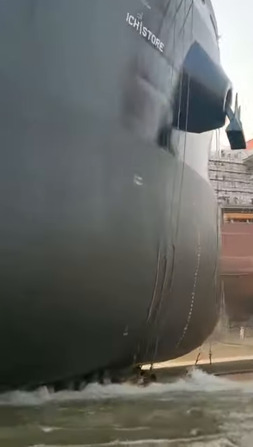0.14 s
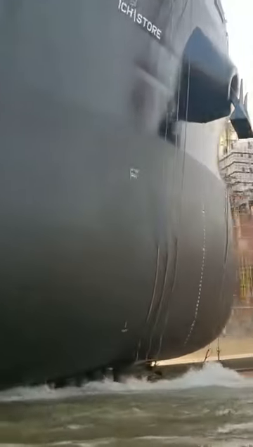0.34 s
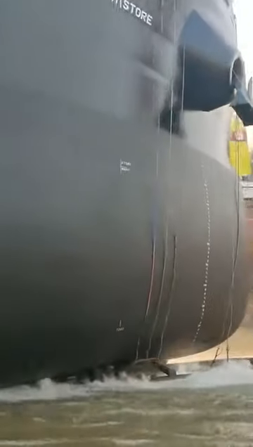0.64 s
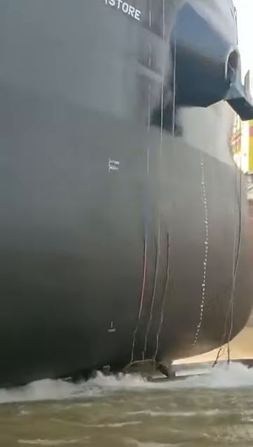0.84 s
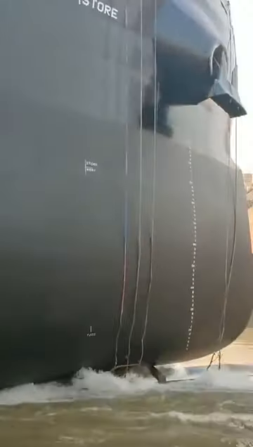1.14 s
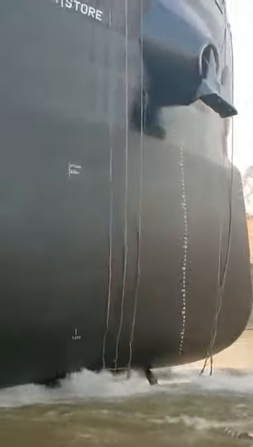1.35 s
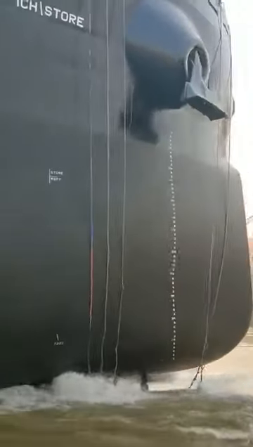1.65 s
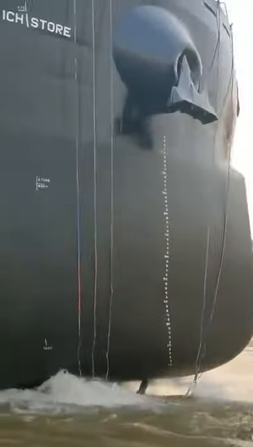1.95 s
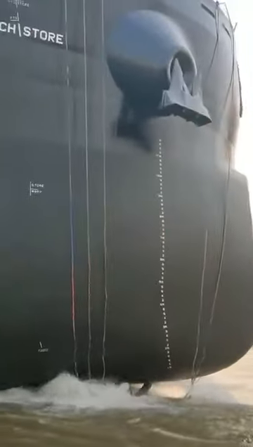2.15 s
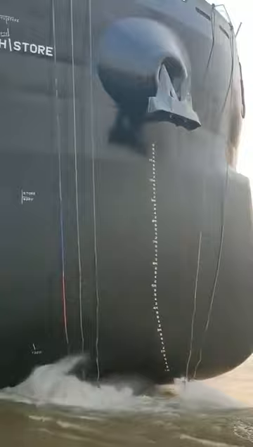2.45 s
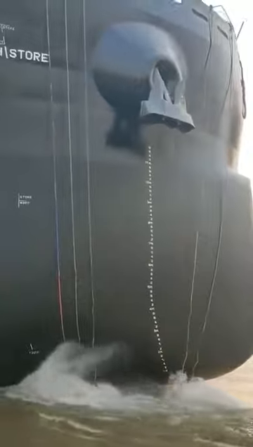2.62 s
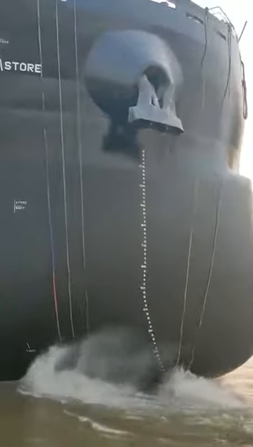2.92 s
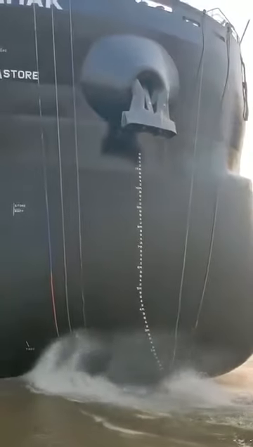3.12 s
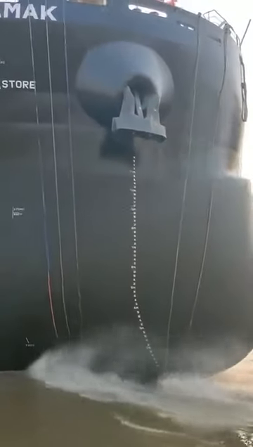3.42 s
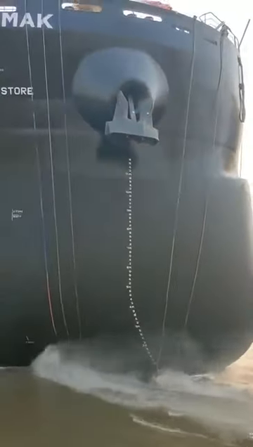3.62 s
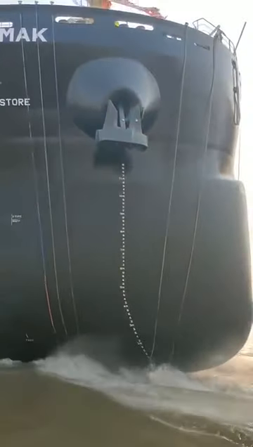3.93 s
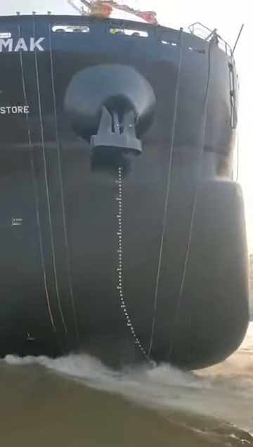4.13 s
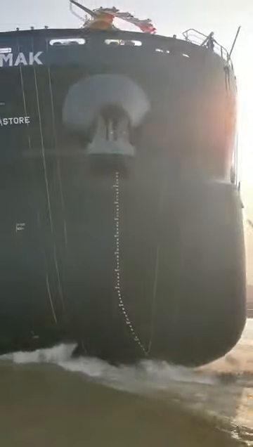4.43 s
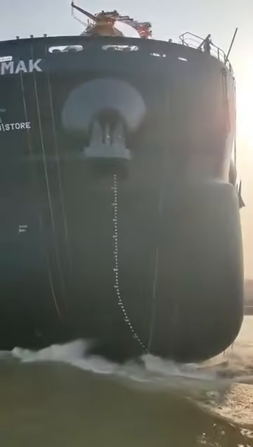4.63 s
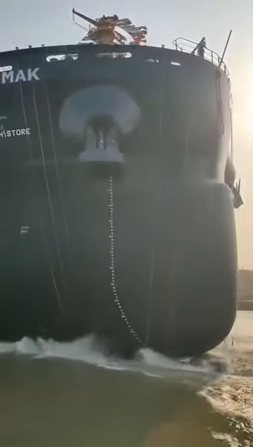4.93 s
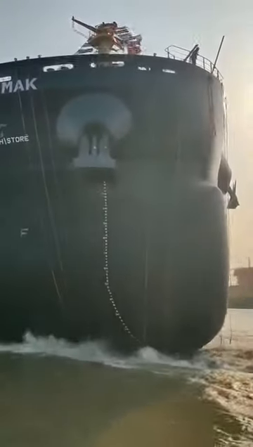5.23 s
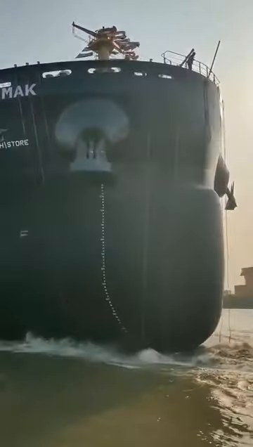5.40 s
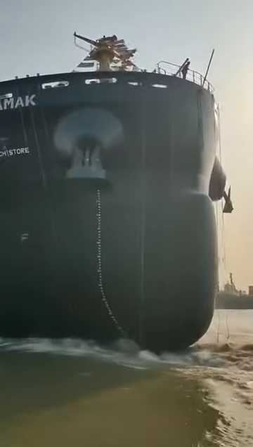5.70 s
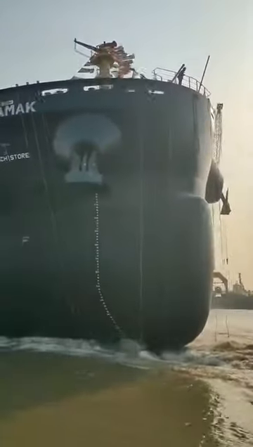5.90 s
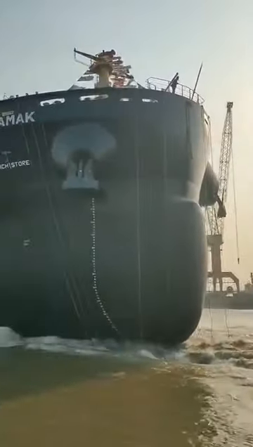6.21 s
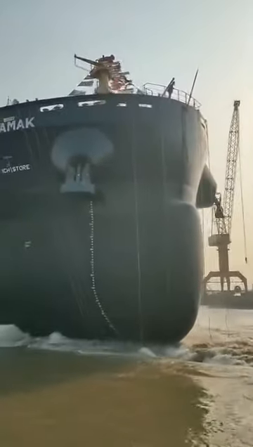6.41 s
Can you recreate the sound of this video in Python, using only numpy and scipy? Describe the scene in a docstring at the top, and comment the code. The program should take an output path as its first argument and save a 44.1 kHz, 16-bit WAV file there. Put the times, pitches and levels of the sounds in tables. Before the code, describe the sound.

Close by a large ship sliding into a river, water churns in a low, uneven rush with faint fizzing spray. Wind booms and thumps on the unprotected stereo microphone, first mostly left, then right. Dry firecracker cracks burst in tight bunches, densest about a quarter of the way in, with hollow knocks and a rolling echo. Near the end the wind rasps and flutters on the right.

```python
"""A large ship slides down a slipway into a river, heard from close by on a windy day.
Water churns and sprays at the bow, as patchy noise; sharp cracks, probably launch firecrackers, are
pressure pulses that go off in bunches, with echoes that roll round the yard.
Wind rumbles and thumps on each of two microphone ports, as uneven low noise and single pulses;
blowing straight across a port it rasps, as fluttering noise, and on the right it also hoots."""
import sys
import numpy as np
from scipy import signal
from scipy.fft import rfft, irfft
from scipy.io import wavfile
from scipy.ndimage import uniform_filter1d, minimum_filter1d

SR = 44100
rng = np.random.default_rng(int(sys.argv[2]) if len(sys.argv) > 2 else 0)


def bounce(signal):
    """Save signal as a 16-bit WAV file at the path given by the first command-line argument."""
    frames = np.transpose(np.atleast_2d(signal))
    limited = np.clip(frames, -1, 1)
    pcm = np.round(limited * 32767).astype(np.int16)
    wavfile.write(sys.argv[1], SR, pcm)


N = 289362
HOP = 128  # samples between spectral frames
TIME = np.arange(N) / SR
FRAME_S = np.arange(N // HOP + 5) * HOP / SR
BIN_HZ = np.fft.rfftfreq(4 * HOP, 1 / SR)


def amp(db):
    """Level: decibels become an amplitude ratio."""
    return 10 ** (np.asarray(db) / 20)


def unit(x):
    """Normalisation: scales to rms 1."""
    return x / np.sqrt(np.mean(x ** 2) + 1e-20)


def curve(rows, t=TIME):
    """Linear interpolation in time of a table of (s, value)."""
    return np.interp(t, *np.transpose(rows))


def spectrum(rows, hz):
    """Interpolation of a table of (Hz, value) on a logarithmic frequency axis."""
    f, value = np.transpose(rows)
    return np.interp(np.log(hz + 1), np.log(f + 1), value)


def coloured(x, rows):
    """Spectral shaping by a table of (Hz, dB)."""
    gain = amp(spectrum(rows, np.fft.rfftfreq(N, 1 / SR)))
    return irfft(rfft(x) * gain, N)


def wander(rate_hz):
    """Low-passed random motion of rms 1, up to about the given rate."""
    hz = np.fft.rfftfreq(N, 1 / SR)
    return unit(irfft(rfft(rng.standard_normal(N)) / (1 + (hz / rate_hz) ** 4), N))


def flutter(rate_hz):
    """Band-passed random pulsing of rms 1 around the given rate."""
    ratio = np.fft.rfftfreq(N, 1 / SR) / rate_hz
    return unit(irfft(rfft(rng.standard_normal(N)) * ratio ** 2 / (1 + ratio ** 4), N))


def band(x, low_hz, high_hz):
    """First-order causal high-pass and low-pass."""
    x = signal.sosfilt(signal.butter(1, low_hz, "high", fs=SR, output="sos"), x)
    return signal.sosfilt(signal.butter(1, min(high_hz, .45 * SR), fs=SR, output="sos"), x)


def dulled(x, edge_hz):
    """Fourth-order causal low-pass."""
    return signal.sosfilt(signal.butter(4, min(edge_hz, .45 * SR), fs=SR, output="sos"), x)


def add(mix, s, sound):
    """Superposition: mixes a sound in at time s."""
    part = mix[max(round(s * SR), 0):][:len(sound)]
    part += sound[:len(part)]


# Left-right likeness of distant sound. Each row: frequency in Hz, correlation from 0 to 1.
PORT_LIKENESS = [(100, 0.58), (550, 1), (1000, 0.63), (1700, 0.17), (3000, 0.049), (8000, 0.07)]


def noise(gain):
    """Partial coherence: stereo noise under a frames x bins gain; the two ports hear the bass alike."""
    a, b, c, d = rng.standard_normal((len(FRAME_S), len(BIN_HZ), 4)).transpose(2, 0, 1)
    same = np.clip(spectrum(PORT_LIKENESS, BIN_HZ), -1, 1)
    left, other = a + 1j * b, c + 1j * d
    right = same * left + np.sqrt(1 - same ** 2) * other
    z = np.array([left, right]) * gain
    return unit(signal.istft(z.transpose(0, 2, 1), nperseg=4 * HOP, noverlap=3 * HOP)[1][:, :N])


def water(rows, patchy_db, flicker_db):
    """Turbulent foam noise: patches of pitch and time collapse; slaps, if any, lift all bands at once."""
    field = rng.standard_normal((len(FRAME_S), len(BIN_HZ)))
    patches = unit(uniform_filter1d(uniform_filter1d(field, size=14, axis=0), size=5, axis=1))
    slaps = np.interp(FRAME_S, TIME, wander(40))[:, None]
    return noise(amp(spectrum(rows, BIN_HZ) + patchy_db * patches + flicker_db * slaps))


# Course of the churning water. Each row: time in seconds, level in dB.
CHURN_LEVEL = [(0, -24.5), (.6, -31.5), (1.2, -30), (1.9, -27), (2.4, -27), (2.9, -28), (3.4, -29),
               (3.9, -30), (4.5, -27), (5.4, -29), (6.56, -28)]
# Colour of the churning water. Each row: frequency in Hz, relative density in dB per Hz.
CHURN_COLOUR = [(30, 1.5), (120, -12), (230, -1), (420, -5.5), (620, -11), (1000, -14.5), (2000, -18.5),
                (4000, -29), (8000, -38), (16000, -54)]


def river():
    """Broadband turbulence: churning water is low-weighted noise of uneven pitch."""
    return amp(curve(CHURN_LEVEL)) * water(CHURN_COLOUR, patchy_db=2.5, flicker_db=0.0)


# Course of the spray thrown up by the bow. Each row: time in seconds, level in dB.
SPRAY_LEVEL = [(0, -43.5), (1.2, -42.5), (2.2, -43.5), (3, -40), (3.8, -43.5), (4.4, -44.5), (5.3, -45),
               (6.56, -47)]
# Colour of the spray. Each row: frequency in Hz, relative density in dB per Hz.
SPRAY_COLOUR = [(1000, -17), (3500, -4), (6500, 7), (10000, 10.5), (16000, 3.5)]


def spray():
    """Broadband fizz: spray is treble noise, all of it lifted at once by slaps."""
    return amp(curve(SPRAY_LEVEL)) * water(SPRAY_COLOUR, patchy_db=1.5, flicker_db=1.4)


def wind_level(steady, buffets):
    """Addition of powers: each buffet swells and dies as a bell on the steady push; level in dB."""
    power = amp(curve(steady)) ** 2
    for s, length, db in buffets:
        power = power + amp(db) ** 2 * np.exp(-np.minimum((2 * (TIME - s) / length) ** 2, 20))
    return 10 * np.log10(power)


# Colour of wind pressing on a port. Each row: frequency in Hz, relative density in dB per Hz.
RUMBLE_COLOUR = [(5, -21), (18, 1.5), (35, 0.5), (65, -7), (110, -10), (200, -14), (350, -24.5), (700, -31),
                 (2000, -67.5)]


def rumble(steady, buffets, lumpy_db):
    """Turbulent pressure: eddies press on one port in uneven lumps."""
    eddies = coloured(rng.standard_normal(N), RUMBLE_COLOUR) * amp(lumpy_db * wander(30.5))
    slow = np.sqrt(uniform_filter1d(eddies ** 2, size=6000) + 1e-20)  # running rms
    return amp(wind_level(steady, buffets)) * eddies / slow


# Steady push of the wind on each port. Each row: time in seconds, level in dB.
PUSH_LEFT = [(0, -15.5), (.85, -20), (1.1, -25), (1.9, -31.5), (2.25, -22.5), (2.85, -20.5), (3.1, -23),
             (4.4, -25.5), (5.3, -30.5), (6.15, -27), (6.56, -36)]
PUSH_RIGHT = [(0, -26), (.3, -22), (.6, -17), (1.15, -16), (1.5, -17.5), (2.2, -21), (2.8, -14),
              (3.2, -17.5), (3.4, -25), (3.6, -16), (3.85, -24), (4.6, -17), (5.3, -21), (5.75, -25.5),
              (6, -19), (6.56, -22.5)]
# Single buffets on each port. Each row: middle in seconds, length in seconds, level in dB.
BUFFET_LEFT = [(0.103, 0.041, -9), (0.243, 0.044, -13.5), (0.473, 0.05, -8.5), (0.747, 0.097, -14),
               (0.876, 0.045, -18), (1.008, 0.038, -7.5), (2.89, 0.047, -14), (3.571, 0.046, -12.5),
               (3.978, 0.054, -14)]
BUFFET_RIGHT = [(.105, 0.077, -6), (1.225, 0.05, -10), (2.38, 0.035, -18), (3.98, 0.077, -12),
                (4.531, 0.041, -26), (4.7, 0.062, -9), (5.14, 0.023, -19), (5.9, 0.085, -13.5),
                (6.14, 0.12, -15)]


def wind_rumble():
    """Local turbulence: the wind presses on each port on its own."""
    left = rumble(PUSH_LEFT, BUFFET_LEFT, lumpy_db=2.0)
    right = rumble(PUSH_RIGHT, BUFFET_RIGHT, lumpy_db=4.0)
    return np.array([left, right])


RASP_ATTACK_S, RASP_RELEASE_S = 0.0096, 0.0049  # time for 10 dB of rise and of fall
# The dull rasp left between gusts, its level and edge relative like those of the gusts.
BREEZE_RELATIVE_DB, BREEZE_EDGE_HZ = -38, 464


def gusting(gusts):
    """Power-weighted level in dB and edge in Hz, per frame: gusts catch the lip, swell or sag, let go."""
    start, length, db, swell_db, edge_hz = np.transpose(gusts)[:, :, None]
    t = FRAME_S - start
    rise = np.maximum(-t, 0) / RASP_ATTACK_S
    fall = np.maximum(t - length, 0) / RASP_RELEASE_S
    swell = swell_db * (np.clip(t / length, 0, 1) - .5)
    power = amp(db + swell - 10 * (rise + fall)) ** 2
    breeze = amp(BREEZE_RELATIVE_DB) ** 2
    total = power.sum(0) + breeze
    return 10 * np.log10(total), ((power * edge_hz).sum(0) + breeze * BREEZE_EDGE_HZ) / total


def pressure_spits(edge_hz, spits_per_s):
    """Impulsive pressure: random eddies spit either way, and a faster eddy passes sooner."""
    size = amp(6.3 * np.minimum(rng.exponential(1, N), 2.5))  # mostly small, a few large
    eddies = size * (rng.random(N) < spits_per_s / SR)
    breadth, sign = rng.uniform(0.61, 1.65, N), rng.choice([-1, 1], N)
    spits = np.zeros(N)
    for i in np.flatnonzero(eddies):
        width = round(breadth[i] * SR / np.interp(TIME[i], FRAME_S, edge_hz))
        add(spits, TIME[i], sign[i] * eddies[i] * np.hanning(width))
    return unit(dulled(band(spits, 255, 8000), 3030))


# Colour of the torn air before its upper edge. Each row: frequency in Hz, relative density in dB per Hz.
RASP_COLOUR = [(30, -3), (150, -11.5), (350, 1.5), (600, -6), (1000, -9), (1500, -7.5), (2200, -8),
               (4000, -12.5), (8000, -18)]


def rasp(gusts, flutter_db, steepness, spit, spits_per_s, brightening=0.26, waver_db=0.8):
    """Edge turbulence: air tears over a lip in a fluttering, spitting hiss that brightens with each gust."""
    level_db, edge_hz = gusting(gusts)
    gust_db = np.clip(level_db + 12.0, -14, 6)
    edge_hz = edge_hz * amp(brightening * gust_db + waver_db * np.interp(FRAME_S, TIME, wander(32)))
    gain = amp(spectrum(RASP_COLOUR, BIN_HZ)) / np.sqrt(1 + (BIN_HZ / edge_hz[:, None]) ** steepness)
    field = rng.standard_normal(gain.shape)
    swirls = unit(uniform_filter1d(uniform_filter1d(field, size=7, axis=0), size=4, axis=1))
    gain = gain * amp(2.5 * swirls)  # passing vortices favour one pitch for a moment
    hiss = noise(gain / np.linalg.norm(gain, axis=1, keepdims=True))[0]
    fluttering = hiss * unit(amp(flutter_db * flutter(162)))
    torn_air = unit(fluttering + spit * pressure_spits(edge_hz, spits_per_s))
    return amp(np.interp(TIME, FRAME_S, level_db)) * torn_air


# Gusts that break over the lip of each port. Each row: start in seconds, length in seconds,
# relative level in dB, swell from start to end in dB, upper edge in Hz before it brightens and wavers.
GUSTS_LEFT = [(0, 0.2, -32, -2, 600), (.22, 0.19, -28.5, -2, 575), (.467, 0.016, -17.5, 4.5, 523),
              (.53, 0.059, -28.5, 10, 474), (.71, .056, -21, 5, 520), (.8, 0.13, -24, -7.5, 400),
              (2.857, 0.014, -19.5, 0, 504)]
GUSTS_RIGHT = [(.05, 0.023, -30, 1, 1040), (.148, 0.029, -28.5, 4, 900), (1.2, 0.012, -19.5, 7, 1290),
               (1.312, 0.019, -18.5, 2, 1390), (1.572, 0.016, -13.5, 9.5, 1720),
               (1.614, 0.037, -20, -4, 1700), (1.667, 0.027, -18.5, -11, 1870),
               (1.698, 0.033, -17, 6.5, 1750), (4.666, 0.036, -14.5, 5, 2690), (4.71, 0.015, -38, 13, 1700),
               (4.748, 0.096, -22.5, -2.5, 3320), (4.835, 0.093, -25, -0.5, 2630),
               (4.94, 0.051, -30.5, 14, 2480), (5.015, .022, -16, 1, 2320), (5.043, 0.026, -21.5, 0, 1300),
               (5.127, 0.071, -19, -4, 1820), (5.175, 0.01, -19, 12, 2370), (5.203, 0.022, -17.5, -1, 2720),
               (5.224, 0.058, -15.5, 0.5, 2200), (5.656, 0.029, -18.5, 2, 2200),
               (5.703, 0.027, -16, -1, 2600), (5.742, 0.0067, -13.5, 7, 2090),
               (5.853, 0.047, -21.5, -6, 2480), (5.886, 0.024, -10, -1, 2300),
               (5.927, 0.032, -14, -4.5, 2100), (5.976, 0.038, -15, -4.5, 2550),
               (6.015, 0.057, -20, -1, 2600), (6.063, 0.044, -20.5, 1.5, 2550),
               (6.12, 0.026, -25.5, 3, 2450), (6.16, 0.053, -17, -5, 2250),
               (6.233, 0.0059, -23.5, -10, 2630), (6.256, 0.034, -16.5, 1, 2300),
               (6.29, 0.04, -22.5, 3, 2370), (6.33, 0.011, -22.5, -1, 3320), (6.372, .022, -24.5, -2, 2310),
               (6.399, 0.025, -16, 5.5, 2350), (6.432, 0.028, -18.5, 1.5, 2100),
               (6.479, 0.026, -20.5, -1.5, 2570), (6.544, 0.013, -20.5, 8, 1940)]


def wind_rasp():
    """Local edge turbulence: each lip tears the air on its own, the right with more frequent spits."""
    left = rasp(GUSTS_LEFT, flutter_db=6.0, steepness=4.4, spit=1.0, spits_per_s=70)
    right = rasp(GUSTS_RIGHT, flutter_db=1.5, steepness=5.34, spit=0.96, spits_per_s=240)
    return np.array([amp(6.5) * left, amp(5.0) * right])


# Single eddies that thump a port. Each row: time in seconds, port (0 left, 1 right),
# relative peak in dB, length in ms.
PORT_THUMPS = [(0.023, 0, -12, 16), (0.099, 1, -7, 16), (.133, 0, -10, 12), (.341, 0, 0, 0.68),
               (0.4413, 0, 2, 7), (0.448, 0, -3, 0.87), (0.451, 1, -2, 2.7), (.458, 1, 7, 2.5),
               (.479, 1, 8, 1.7), (0.482, 0, 1, 1.6), (0.575, 0, -10, 2.6), (.715, 0, -9, 0.86),
               (0.737, 0, -4, 3), (0.7522, 0, 1, 4.3), (.757, 0, -5, 0.81), (.812, 0, -1, 3.2),
               (0.873, 0, 1.5, 6.4), (0.902, 0, -9, 3.4), (1.2108, 1, 2, 0.47), (1.263, 1, -2, 0.84),
               (1.319, 1, 1, 0.31), (1.3305, 1, -1, 0.73), (1.637, 1, -8, 0.41), (1.731, 1, -1, 0.49),
               (2.866, 0, -11, 3.2), (4.668, 1, -0.5, .5), (5.28, 1, 1.5, 0.45), (5.7497, 1, -14, 0.67),
               (5.975, 1, -10, 0.31), (6.282, 1, -9, 0.29), (6.445, 1, -2, 0.83)]


def thumps(rebound=0.16, rough=0.12):
    """Vortex passage: an eddy sucks at the port and pushes back, ragged with smaller eddies."""
    out = np.zeros((2, N))
    for s, port, db, length_ms in PORT_THUMPS:
        u = np.arange(-SR // 25, SR // 25) * 1000 / SR / length_ms
        pulse = rebound * np.exp(-(u - 1) ** 2 * 2) - np.exp(-(2 * u) ** 2)
        ragged = 1 + rough * unit(dulled(rng.standard_normal(len(u)), 600))
        before_start = max(round((1 / 25 - s) * SR), 0)
        add(out[round(port)], s - 1 / 25, (amp(db) * pulse * ragged)[before_start:])
    return out


SNAP_HZ, SNAP_WIDTH_HZ = 4460, 3200  # the bright band in which a casing bursts


def blast(push_ms, snap_db, suck=0.19, front=2100, snap_ms=0.95, shock=0.088):
    """Blast wave: a shock, a push and a suck; the longer the push, the more rounded its front."""
    ms = np.arange(3000) * 1000 / SR
    u = ms / push_ms
    wave = (1 - u) * np.exp(-u) - suck * np.exp(-(u - 2) ** 2 * 2)
    edges = [SNAP_HZ - SNAP_WIDTH_HZ / 2, SNAP_HZ + SNAP_WIDTH_HZ / 2]
    casing = signal.butter(2, edges, "band", fs=SR, output="sos")
    tearing = unit(signal.sosfilt(casing, rng.standard_normal(len(ms))))
    wave = wave + amp(snap_db) * np.exp(-ms / snap_ms) * tearing
    wave = signal.sosfilt(signal.butter(2, min(front / push_ms, 9000), fs=SR, output="sos"), wave)
    return wave + shock * band(signal.unit_impulse(len(ms)), 9200, 19000)


def small_pops(per_crack=.4, spread_s=0.045, pop_db=-23):
    """Random clustering: weaker, farther crackers of the same bunch go off around the loud ones."""
    pops = []
    draws = rng.random((len(CRACKERS), 3))
    for (s, db, _, _, knock_hz, snap_db), (chance, delay, size) in zip(CRACKERS, draws):
        if db > -9 and chance < per_crack:
            pops.append((s + spread_s * (2 * delay - .3), pop_db + 7 * size, .4, -4, knock_hz, snap_db))
    return pops


KNOCK_MS, KNOCK_DB = 4.7, -16  # decay of the hollow ring after each crack, and its level against the crack
SCATTER_EDGE_HZ = 4900  # the quay throws back little treble
# Firecrackers. Each row: time in seconds, relative level in dB, length of the pressure push in ms,
# relative scattered sound in dB, pitch of the hollow ring in Hz, relative bright snap of the casing in dB.
CRACKERS = [(0.061, -8.5, 1, -3, 480, -24), (.498, -18.5, 0.23, 12.5, 1460, -25),
            (.919, -20.5, 0.26, 4, 690, -19), (0.957, -18.5, 0.35, 8.5, 600, -21),
            (1.3486, 3, 0.63, 0.5, 420, -16), (1.3974, -8.5, .6, 9, 320, -17),
            (1.4596, 7, 0.47, -10, 560, -20), (1.4967, 1.5, 0.41, -7, 560, -15),
            (1.510, -3.5, 0.98, -11, 500, -21), (1.5361, 5, 0.4, -1.5, 430, -24),
            (1.5464, -7, .55, 2.5, 450, -16), (1.5817, 0.5, 0.43, 5, 453, -19),
            (1.5905, -10, 1, -21, 497, -13), (1.6282, 5.5, 0.69, -22, 674, -25),
            (1.677, -3, 0.54, 3, 445, -21), (1.7508, 4, 0.74, -9, 725, -23),
            (1.7991, -0.5, 0.58, 3, 440, -11), (1.8047, -10, .4, -3, 510, -14),
            (2.422, 2, 0.7, -12, 650, -19), (2.484, -7.5, 0.63, 2, 487, -17),
            (3.2673, 0, 0.64, -2, 726, -10), (3.3139, -8, .5, -6, 500, -14),
            (3.3168, 3, 0.46, -12, 633, -9.5), (3.3472, -0.5, 0.94, -5, 446, -26),
            (3.7387, -10, 0.29, -1, 1020, -13.5), (4.029, 4.5, 0.47, -11, 427, -11),
            (4.0536, 3.5, 0.51, -4.5, 443, -13), (4.080, -16, 0.57, -12, 500, -18),
            (4.103, -5.5, 0.38, 0, 740, -17), (4.1252, -4.5, 0.57, 11, 400, -17),
            (4.1504, -2, 0.71, 2.5, 335, -21), (4.2242, -7.5, .75, 5, 420, -17),
            (4.767, 0, 0.46, -6, 358, -11), (4.8141, 0, 0.53, -4, 470, -22),
            (4.8164, 2, 0.47, -9, 478, -14.5), (4.879, -5.5, 0.75, -20, 456, -19),
            (5.5869, 7, 0.47, -14, 455, -28), (5.6345, 1.5, 0.46, -3.5, 510, -24)]
# Near reflections of each crack. Each row: delay in ms before random stretching, relative level in dB.
NEAR_ECHOES = [(1.75, -10), (3.6, -10.5), (4.4, -12), (7.2, -25.5), (10.5, -31), (15, -37)]


def firecrackers(right_lead_ms=0.095, scatter_ms=8, apart=0.82, echo_edge_hz=5500):
    """Reflection and scattering: a blast, its hollow ring, echoes, and quay scatter unlike in the ports."""
    out, ms = np.zeros((2, N)), np.arange(3000) * 1000 / SR
    for s, db, push_ms, scatter_db, knock_hz, snap_db in list(CRACKERS) + small_pops():
        wave = amp(db) * blast(push_ms, snap_db)
        # each bursts at its own spot, so its echoes are shifted
        shift = np.clip(1 + .08 * rng.standard_normal(len(NEAR_ECHOES)), .5, 2)
        knock = amp(db + KNOCK_DB) * np.exp(-ms / KNOCK_MS) * np.sin(2 * np.pi * knock_hz * ms / 1000)
        echo, dull = band(wave, 25, echo_edge_hz), band(wave, 19, SCATTER_EDGE_HZ)
        shared = rng.standard_normal(len(ms))
        for port, start in zip(out, (s, s - right_lead_ms / 1000)):
            add(port, start, wave + knock)
            for (delay_ms, echo_db), stretch in zip(NEAR_ECHOES, shift):
                add(port, start + delay_ms * stretch / 1000, amp(echo_db) * echo)
            scatter = shared + apart * rng.standard_normal(len(ms))
            scatter = scatter * np.exp(-ms / scatter_ms) * (1 - np.exp(-ms))
            scatter = scatter / np.linalg.norm(scatter)
            add(port, start, amp(scatter_db - 1.0) * signal.fftconvolve(dull, scatter))
    return amp(2.5) * band(out, 162, 8800)


# Ring of the yard and hull. Each row: frequency in Hz, time to decay by 60 dB in seconds.
YARD_DECAY = [(200, 6.1), (600, 2.48), (2000, 1.75), (8000, 0.87)]


def yard(x):
    """Reverberation: a long diffuse tail, dying faster in the treble."""
    tail = noise(amp(-60 * FRAME_S[:, None] / spectrum(YARD_DECAY, BIN_HZ)))[:, :2 * SR]
    tail = tail * (1 - np.exp(-TIME[:2 * SR] / 0.006))  # builds up over milliseconds
    return signal.fftconvolve(x, tail / np.linalg.norm(tail[0]), axes=1)[:, :N]


# Thin bright ticks of the left port when it is hit hard. Each row: time in seconds, relative level in dB.
PORT_TICKS = [(0.4403, -1.5), (2.421, -3), (4.0293, -5), (4.054, -5), (4.7668, -6)]


def ticks(ring_ms=0.39):
    """Impulsive excitation: a very short, decaying burst of treble noise."""
    out, ms = np.zeros(N), np.arange(200) * 1000 / SR
    for s, db in PORT_TICKS:
        add(out, s, amp(db) * np.exp(-ms / ring_ms) * rng.standard_normal(len(ms)))
    return band(band(out, 6500, 16000), 6500, 16000)


# Vortices that lock on to the right port and hoot hoarsely. Each row: start in seconds, length in seconds,
# relative level in dB, start pitch in Hz, end pitch in Hz, both before jitter.
PORT_HOOTS = [(4.694, 0.019, -10, 863, 705), (5.04, .045, -20.5, 521, 453), (5.271, 0.013, -8.5, 1012, 720),
              (5.745, 0.023, -11, 750, 394), (5.788, 0.03, -15, 416, 472), (5.944, 0.011, -7.5, 700, 800),
              (6.408, 0.043, -14.5, 509, 447)]


def hoots(pitch_jitter=0.13, rough_db=6.5):
    """Vortex shedding: a sliding, unsteady pitch sounds briefly."""
    out, sway, size = np.zeros(N), wander(300), unit(amp(rough_db * flutter(200)))
    for s, length, db, start_hz, end_hz in PORT_HOOTS:
        u = np.clip((TIME - s) / length, 0, 1)
        on = (u > 0) & (u < 1)
        hz = (start_hz + (end_hz - start_hz) * u[on]) * (1 + pitch_jitter * sway[on])
        swell = np.sqrt(2 * np.sin(np.pi * u[on]))
        out[on] += amp(db) * swell * size[on] * np.sin(2 * np.pi * np.cumsum(hz) / SR)
    return out


def scene():
    """Superposition: water and blasts reach both ports; the wind strikes each on its own."""
    wind = wind_rumble() + wind_rasp() + thumps() + np.array([ticks(), hoots()])
    cracks = firecrackers()
    return river() + spray() + wind + cracks + amp(-12) * yard(cracks)


def port_response(gain_db):
    """Minimum phase: a causal filter from a table of (Hz, dB), so shocks stay sharp."""
    log_gain = np.log(amp(spectrum(gain_db, abs(np.fft.fftfreq(4096, 1 / SR)))))
    return np.fft.ifft(np.exp(np.conj(signal.hilbert(log_gain)))).real


def limited(x, release_db_per_s=900):
    """Peak limiting on each port: catches a peak just ahead and ducks the next few milliseconds."""
    ceiling = .8
    over_db = 20 * np.log10(np.maximum(abs(x) / ceiling, 1))
    fall = TIME * release_db_per_s
    cut_db = np.maximum.accumulate(over_db + fall, axis=1) - fall
    return x * amp(uniform_filter1d(minimum_filter1d(-cut_db, size=9, axis=1), size=9, axis=1))


CUTOFF_HZ = 15600
# Colour of the two microphone ports. Each row: frequency in Hz, left gain in dB, right gain in dB.
PORT_COLOUR = [(20, -1, -1.5), (1100, -3, -3), (1230, 0.5, -0.5), (1630, -4.5, -3.5), (2190, -2, -4.5),
               (2480, -0.5, -4), (2930, -3, -3.5), (4090, -8.5, -9.5), (4600, -16.5, -23),
               (5100, -8, -10.5), (5690, -1.5, -3.5), (6670, 2.5, -2.5), (8170, -8, -2.5),
               (9800, -18.5, -17.5), (13200, -21, -22.5), (14500, -30, -27), (15500, -56, -23)]


def record(dry):
    """Filtering and limiting: microphone colour, the limiter, short end fades and the band limit."""
    hz, *ports = np.transpose(PORT_COLOUR)
    responses = np.array([port_response(np.column_stack([hz, db])) for db in ports])
    heard = limited(signal.oaconvolve(dry, responses, axes=1)[:, :N])
    heard = heard * signal.windows.tukey(N, .001)
    low_pass = signal.firwin(511, CUTOFF_HZ, window=("kaiser", 9), fs=SR)
    return signal.oaconvolve(heard, low_pass[None], "same")


dry = scene()
out = record(dry)
bounce(out)
```